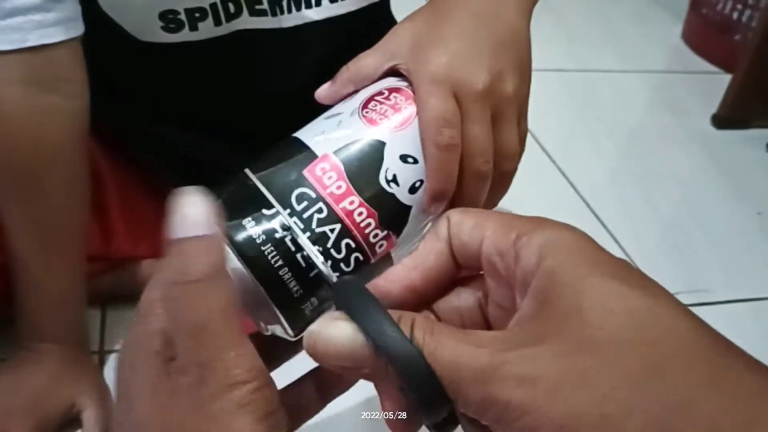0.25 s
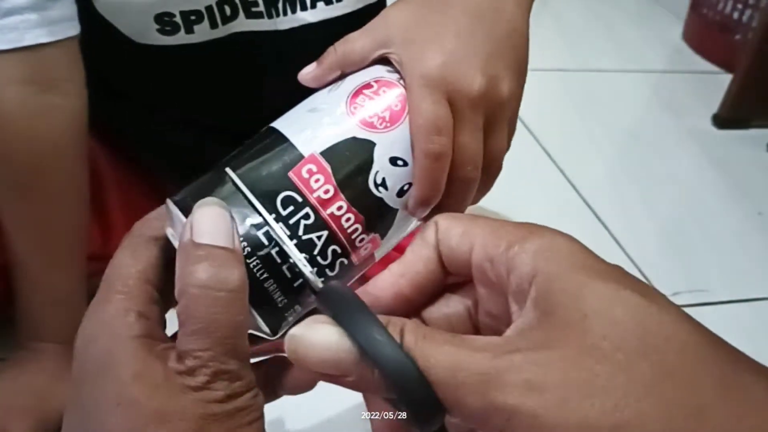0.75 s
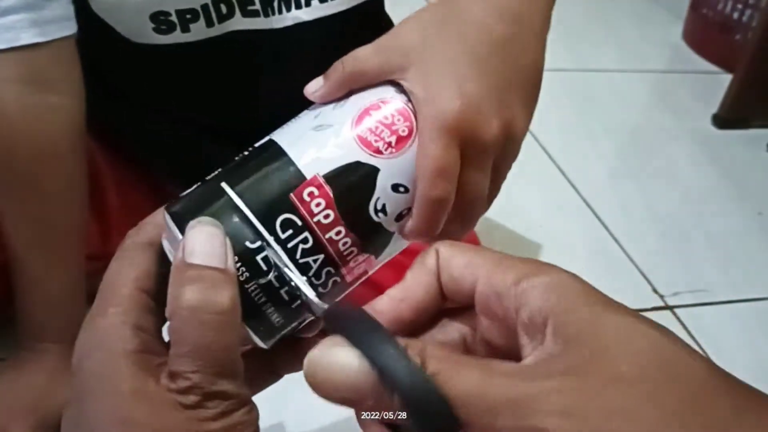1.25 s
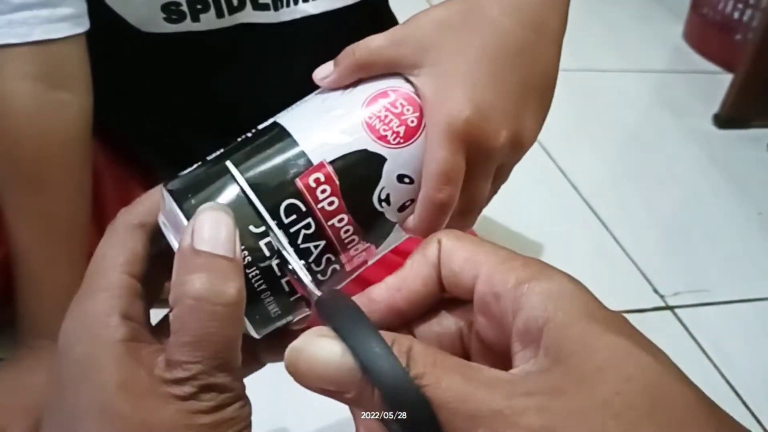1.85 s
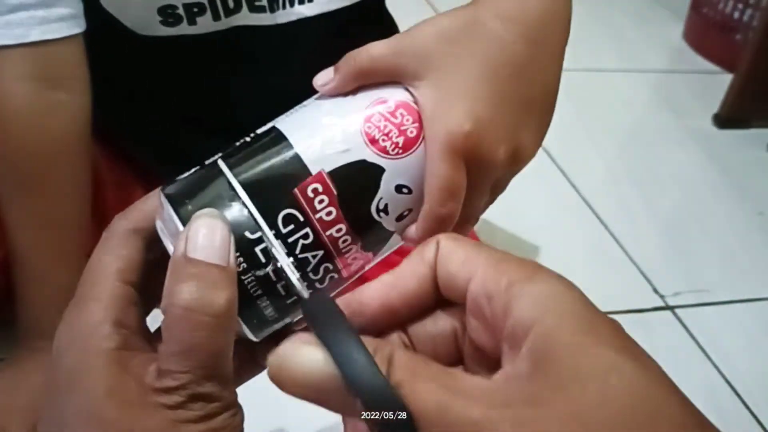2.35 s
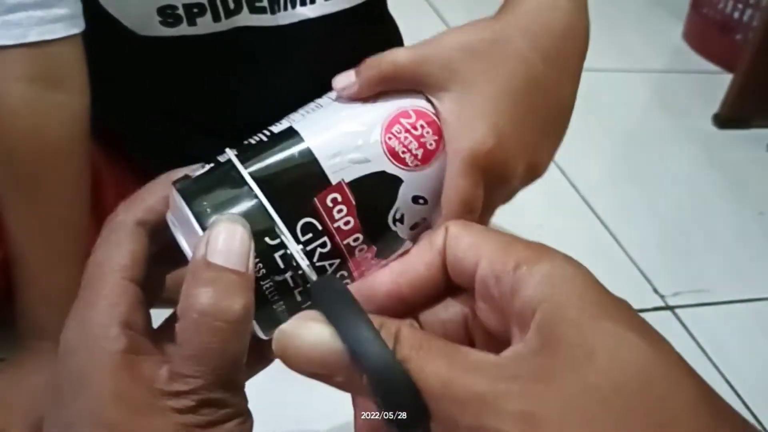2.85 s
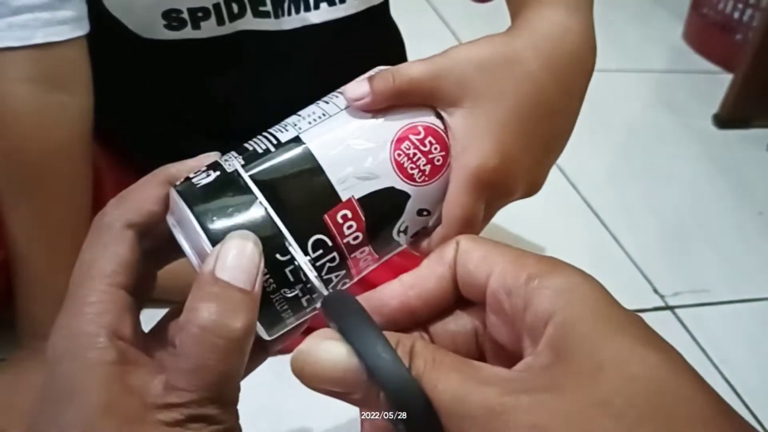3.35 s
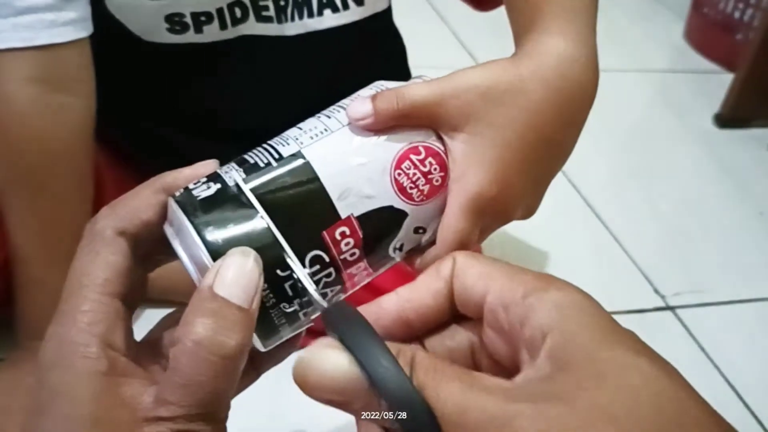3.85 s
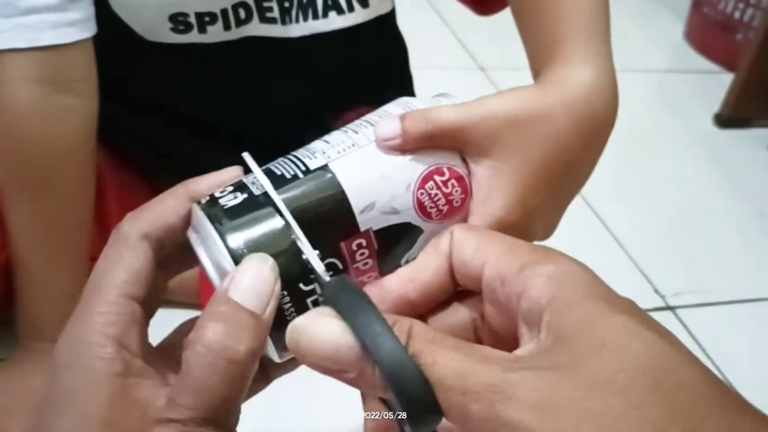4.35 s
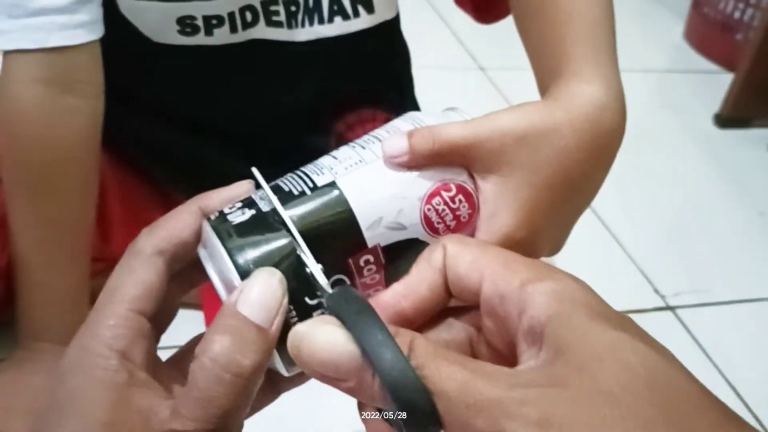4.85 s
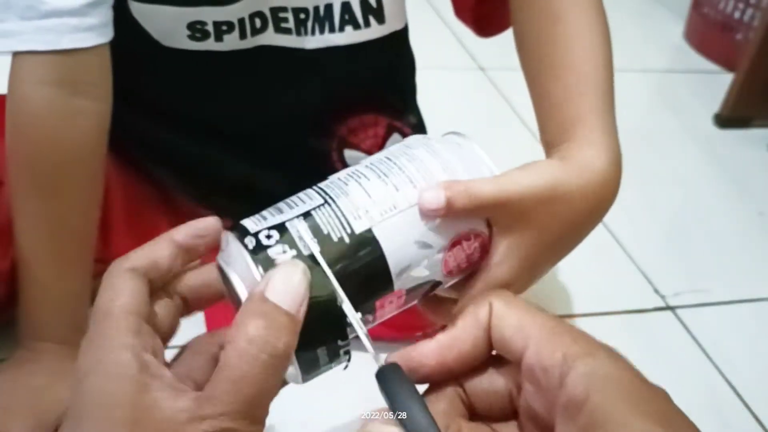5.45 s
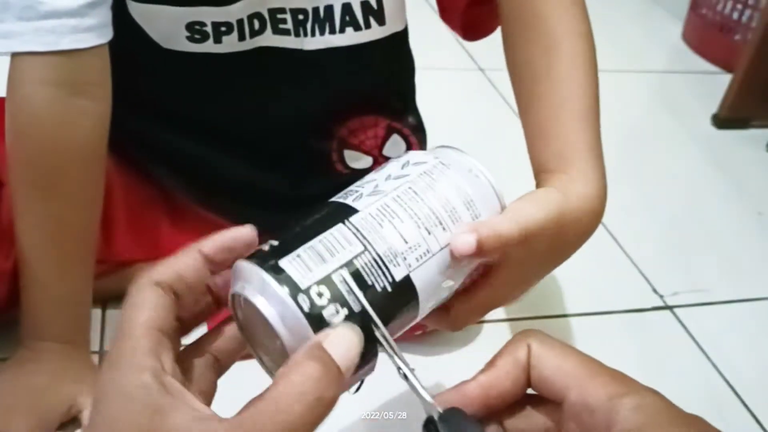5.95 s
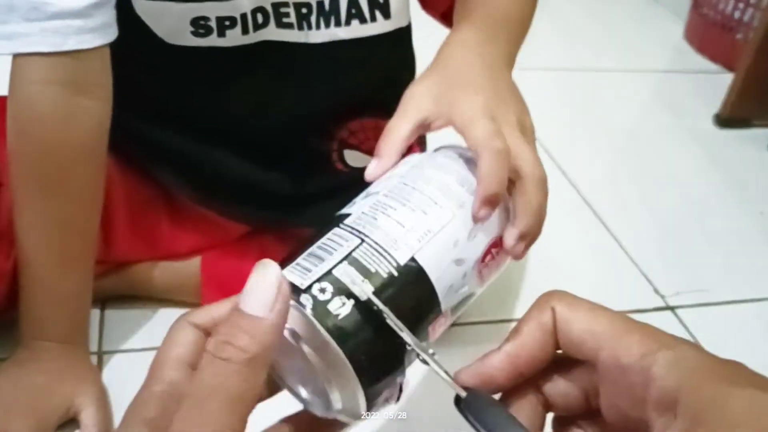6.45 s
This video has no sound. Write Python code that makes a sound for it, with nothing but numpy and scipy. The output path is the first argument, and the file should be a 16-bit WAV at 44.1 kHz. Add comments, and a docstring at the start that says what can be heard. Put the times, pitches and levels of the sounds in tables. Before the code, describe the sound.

Scissors cut through an empty drinks can close by, with sharp metallic snaps, short rasps and faint squeaks in a small room.

```python
"""Scissors cutting an empty drinks can

Close by, in a small tiled room, the blades rasp through the thin metal in short strokes and squeak faintly.
The can's wall snaps and buckles, and the cut edge rings. Hands shift on the can, over a low hum and room
noise. The loudest snaps overload the microphone."""
import sys
import numpy as np
from scipy import signal
from scipy.fft import rfft, irfft, next_fast_len
from scipy.io import wavfile
from scipy.ndimage import uniform_filter1d

SR = 44100
rng = np.random.default_rng(int(sys.argv[2]) if len(sys.argv) > 2 else 0)


def generate_wav(sig):
    """Save sig (samples, or channels by samples) to the path in sys.argv[1] as 16-bit PCM at SR."""
    pcm = np.round(np.clip(np.atleast_2d(sig).T, -1, 1) * 32767).astype(np.int16)
    wavfile.write(sys.argv[1], SR, pcm)


N = 295029
CUTOFF_HZ = 15500

# Snaps of the wall, with relative levels: t/s, peak/dB, bass/dB, middle/dB, top/dB
SNAPS = [(0.219, 3, -30.5, -15, -28.5), (0.263, -5, -27.5, -16, -31.5), (0.32, -10.5, -26.5, -20.5, -45.5),
         (0.376, 2, -18.5, -13, -19), (0.442, -11.5, -29, -23, -37.5), (0.583, -24, -40.5, -47.5, -50.5),
         (0.743, -23, -36.5, -40.5, -46.5), (1.14, 2, -47, -14, -13.5), (1.202, -2.5, -32, -19, -21.5),
         (1.332, 1, -32, -22, -16.5), (1.415, -1.5, -31, -23, -23), (1.608, -2.5, -24.5, -24, -32.5),
         (1.924, -20, -47.5, -26, -41.5), (2.008, -11.5, -40.5, -12, -41), (2.033, -7, -27, -22, -19),
         (2.057, -2.5, -29.5, -10, -21), (2.196, -12, -35, -43, -26), (2.285, -9, -29.5, -31, -35),
         (2.375, -13.5, -30, -38, -31.5), (2.491, -0.5, -22, -8, -16.5), (2.503, -9, -17.5, -22, -26),
         (2.641, 2.5, -26.5, -18.5, -10.5), (2.655, 2, -30.5, -22.5, -12.5), (2.957, 2.5, -22, -4.5, -23.5),
         (2.993, -6, -38, -17, -36.5), (3.094, -5, -30, -28.5, -24.5), (3.486, -11.5, -37, -20.5, -42),
         (3.673, 0.5, -31.5, -14, -24.5), (3.765, -13, -24.5, -26.5, -35), (3.899, 0, -20.5, -21, -10.5),
         (3.946, -5, -27.5, -18, -25.5), (3.984, -4.5, -24.5, -14.5, -22.5), (4.018, -0.5, -22.5, -17, -28),
         (4.159, -18, -29, -26, -38.5), (4.424, -17.5, -31, -24.5, -44.5), (4.481, -7.5, -22, -29.5, -31.5),
         (4.722, -25.5, -32.5, -47.5, -62), (4.88, -2, -34, -30.5, -24.5), (4.971, 6, -29.5, -8.5, -16.5),
         (5.062, -6, -38.5, -20, -36.5), (5.15, -0.5, -26.5, -24.5, -16), (5.254, -11.5, -33, -40.5, -40),
         (5.361, 0, -56.5, -24, -17.5), (5.374, 1, -47, -36, -9), (5.43, -5, -39.5, -23.5, -17),
         (5.764, 6, -24, -8.5, -9), (5.806, -6.5, -23, -5, -37), (6.009, -2, -20.5, -4, -40.5),
         (6.049, 2, -14, -20.5, -11.5), (6.162, -1, -18, -9, -16.5), (6.167, 0.5, -28, -23.5, -20),
         (6.322, -8.5, -27.5, -24.5, -20), (6.622, -18.5, -40, -32.5, -35)]
def snaps(modes, rise_s=0.00024, spike_s=0.00038, delay_s=0.0013, damping=0.27, gain_db=-7.5):
    """Stressed metal gives way with a sharp crack; the spot that buckles sets the tone colour."""
    out = np.zeros(N)
    times, peaks, *bands = np.transpose(SNAPS)
    shares = np.transpose(bands - peaks)
    colours = shares - shares.mean(axis=0) + [1, 2, -2.5]   # the average snap's bass, middle and top
    # A harder jolt against the gripping hands dies sooner. t60 is the time to fade by 60 dB.
    ring_times = np.clip(0.043 * from_db(-damping * (peaks - peaks.mean())), 0.008, 1)
    for s, peak_db, t60, colour in zip(times, peaks, ring_times, colours):
        t = seconds(t60)
        crack = wall_ring(modes, t60, *colour) * (1 - np.exp(-t / rise_s))
        spike = 1 + 0.76 * np.exp(-t / spike_s)
        add(out, s + delay_s, from_db(peak_db + gain_db) * crack * spike)
    return out


# Strokes of the blades, with relative levels: start/s, end/s, level/dB, bass/dB, brightness/dB
STROKES = [(0, 0.07, -23.5, -15, 0.5), (0.245, 0.254, -28, 3, 1), (1.091, 1.101, -41.5, 14.5, -9),
           (1.161, 1.311, -25, -10, -0.5), (1.793, 1.913, -38.5, 16, -4), (1.945, 1.996, -31.5, -4, -22),
           (2.01, 2.048, -23, -4.5, -22), (2.174, 2.255, -20.5, 8.5, -3), (2.277, 2.368, -25, 12.5, 2),
           (2.497, 2.536, -17, -2.5, -7.5), (2.864, 2.937, -37.5, -1, -6.5), (2.922, 2.961, -24.5, 4, -10),
           (3.111, 3.205, -29.5, 19, -13), (3.398, 3.501, -41.5, -1, -2), (3.628, 3.74, -25, 7, 1),
           (3.765, 3.811, -28.5, 17, 3), (3.824, 3.903, -37, 10, -4), (3.903, 3.975, -19, 10, -3),
           (4.17, 4.282, -34.5, 14, -5.5), (4.451, 4.512, -25, 9, -2.5), (4.872, 4.964, -24.5, -4, 6.5),
           (4.972, 5.049, -23.5, 4, 9.5), (5.165, 5.257, -32.5, 14.5, 1), (5.398, 5.525, -22.5, -27, 9),
           (5.869, 5.998, -38.5, 12, 18), (5.991, 6.047, -26.5, 7, -2), (6.146, 6.191, -20, 11, -15),
           (6.345, 6.551, -38.5, -1, 7), (6.598, 6.695, -31.5, 9, -0.5)]
def rasps(modes, slips_per_s=1000, bite_s=0.0054, release_s=0.0098, catch_db=13, gain_db=-5.5):
    """Cutting is a run of tiny uneven slips that each jolt the wall; a few catch and crackle."""
    out = np.zeros(N)
    for start, end, level_db, bass_db, bright_db in STROKES:
        t = seconds(max(end - start, 0.008))
        pressure = np.minimum(1, np.minimum(t / bite_s, (t[-1] - t) / release_s))
        colour = bass_db, -0.47 * bright_db, bright_db - 4   # brighter: less middle, more top
        jolts = np.array([wall_ring(modes, 0.016, *colour) for _ in range(3)])
        shape = (len(jolts), len(t))
        sizes_db = np.clip(rng.standard_normal(shape), -2, 2)
        sizes_db += catch_db * (rng.random(shape) < 0.03)
        slips = (rng.random(shape) < slips_per_s / len(jolts) / SR) * from_db(sizes_db)
        pushes = slips * pressure * rng.choice([-1, 1], shape)
        grind = signal.fftconvolve(pushes, jolts, axes=1).sum(axis=0)
        add(out, start, from_db(level_db + gain_db) * rms_one(grind) * np.sqrt(len(grind) / len(t)))
    return out


# How strongly the wall rings at each pitch: f/Hz, level/dB
WALL = [(120, -25), (200, 0), (365, -23.5), (422, -2.5), (618, -12.5), (906, -4.5), (1330, -7),
        (1950, -6.5), (2250, -10), (3750, -3.5), (6590, -4.5), (7900, 1), (12000, -14), (14700, -7),
        (15500, -4)]
def wall_modes(count=480):
    """A thin can has hundreds of crowded modes, the tones it rings at: their pitches and strengths."""
    root = np.linspace(np.sqrt(230), np.sqrt(CUTOFF_HZ), count)
    hz = (root + (root[1] - root[0]) * rng.uniform(-0.83, 0.24, count)) ** 2
    return hz, from_db(at_hz(WALL, hz)) * np.sqrt(root)   # high modes are sparser, so each gets more


# Where the bass, middle, upper middle and top of a jolt lie: f/Hz
BANDS_HZ = [750, 2800, 7300, 13000]
def wall_ring(modes, t60, bass_db, middle_db, top_db, uneven_db=2.5, detune=0.0053):
    """One jolt of the wall: where it lands decides which modes answer, and bending detunes them."""
    hz, gains = modes
    colour_db = at_hz(list(zip(BANDS_HZ, [bass_db, middle_db, 0, top_db])), hz)
    bent_hz = hz * (1 + detune * rng.standard_normal(len(hz)))
    strengths = gains * from_db(colour_db + uneven_db * rng.standard_normal(len(hz)))
    t = seconds(t60)
    phase = 2 * np.pi * (np.outer(bent_hz, t) + rng.random((len(hz), 1)))
    return rms_one(strengths @ np.sin(phase.astype(np.float32))) * from_db(-60 * t / t60)


# Tones of the can that the hands hardly muffle: f/Hz, gain/dB, t60/s
CAN_MODES = [(421, -20, 0.41), (679, -2.5, 0.41), (763, -0.5, 0.19), (888, -3, 0.45), (1898, 3.5, 0.21),
             (3190, 3, 0.15), (8100, -0.5, 0.045)]
def can_body(x):
    """Every jolt also feeds the can's longer-lasting tones."""
    out = np.zeros(N)
    for hz, gain_db, t60 in CAN_MODES:
        r = from_db(-60 / (t60 * SR))   # share of the ring left after one sample
        feed = (1 - r * r) / 2 * np.array([1, 0, -1])
        feedback = [1, -2 * r * np.cos(2 * np.pi * hz / SR), r * r]
        out += from_db(gain_db) * signal.lfilter(feed, feedback, x + 1e-18)
    return out


# Flexes of the metal: t/s, f/Hz, level/dB, t60/s
FLEXES = [(.222, 611, -28.5, 0.59), (.223, 1966, -25, 0.21), (0.379, 1115, -14.5, 0.014),
          (.446, 2050, -20, 0.058), (1.142, 689, -41, 1), (1.205, 1890, -21, 0.19),
          (1.61, 940, -18.5, 0.032), (2.491, 3355, -27, 0.21), (2.503, 679, -29.5, 0.31),
          (2.719, 997, -11, 0.019), (2.724, 767, -26.5, 0.36), (3.487, 1934, -28, 0.22),
          (3.937, 980, -22, 0.095), (3.948, 1036, -19, 0.11), (3.983, 894, -12, 0.055),
          (4.02, 1120, -10.5, 0.023), (4.061, 3220, -35.5, 0.4), (4.497, 934, -26, 0.14),
          (4.498, 462, -30.5, 0.075), (5.765, 8100, -26, 0.38), (5.768, 3305, -33.5, 0.43),
          (5.766, 761, -31, 0.35), (6.011, 1697, -21, .15), (6.161, 1175, -20.5, 0.056)]
def flexes():
    """A patch of wall or the cut edge flexes with a hollow pop or a longer ring."""
    return beating_tones(FLEXES, split=0.06, side_share=0.52, rise_s=0.00091)


# Knocks as the blades break through: t/s, f/Hz, level/dB, t60/s
KNOCKS = [(.475, 83, -36.5, .08), (2.365, 111, -37, 0.18), (5.376, 102.6, -18, 0.018)]
def knocks():
    """Dull thumps travel through the hands."""
    return beating_tones(KNOCKS, split=0.13, side_share=0.48, rise_s=0.0016)


# The tones in a squeak: pitch ratio, relative level/dB
SQUEAK_TONES = [(0.566, -2), (.985, 6), (1.03, -2.5), (1.31, -10), (1.56, -8.5), (1.89, 2.5)]
# Slides of blade on blade, one list of points each: t/s, f/Hz, level/dB
SLIDES = [
    [(4.17, 7000, -73), (4.22, 7750, -52), (4.27, 8180, -50), (4.34, 8200, -51), (4.41, 8040, -51),
     (4.46, 7600, -68)],
    [(5.89, 7350, -68), (5.96, 7600, -51.5), (6.02, 7450, -53)],
]
def squeaks(waver=0.0016, flutter_db=5.0, hiss_db=-4.0):
    """Sliding blades sing unsteadily over a faint hiss; the pitch bends as the point of contact moves."""
    out = np.zeros(N)
    for slide in SLIDES:
        s, pitch, level = np.transpose(slide)
        t = s[0] + seconds(s[-1] - s[0])
        sound = from_db(hiss_db) * rng.standard_normal(len(t))
        for ratio, db in SQUEAK_TONES:
            hz = ratio * np.interp(t, s, pitch) * (1 + waver * drift(t, width_s=0.00098))
            gain = from_db(db + flutter_db * drift(t, width_s=0.011))
            sound += gain * np.sin(2 * np.pi * np.cumsum(hz) / SR)
        add(out, s[0], from_db(np.interp(t, s, level)) * sound)
    return out


# Tone colour of the echoes: f/Hz, gain/dB
ECHO = [(200, -6.5), (700, -8.5), (2000, -8.5), (4000, -6), (8000, -8), (15000, -9)]
def room_echo(x, t60=0.43, gap_s=0.0087, build_s=0.0053, gain_db=0.5):
    """Echoes from tiles and walls thicken after a short gap, then die away."""
    t = seconds(0.6)
    swell = 1 - np.exp(-(np.maximum(t - gap_s, 0) / build_s) ** 2)
    decay = swell * from_db(-60 * t / t60)
    echoes = noise(len(t), ECHO) * decay / np.sqrt(np.sum(decay ** 2))
    return from_db(gain_db) * signal.fftconvolve(x, echoes)[:N]


# How loud the hands are: t/s, level/dB
GRIP = [(0.0, -48.5), (0.47, -46), (0.52, -48.5), (1.21, -57), (1.3, -45.5), (3.2, -44), (3.26, -53.5),
        (3.76, -38), (3.89, -48), (4.57, -44), (4.66, -60.5), (5.37, -41), (5.44, -58.5), (6.18, -38.5),
        (6.56, -49), (6.69, -43)]
# Tone colour of their rumble: f/Hz, relative level/dB
RUMBLE = [(15, -52.5), (25, -37.5), (65, 1), (118, 2.5), (162, -2.5), (260, -19.5), (340, -42.5),
          (570, -120)]
def hands():
    """Hands shifting their grip on the can make a low rumble."""
    return loudness_curve(GRIP) * rms_one(noise(N, RUMBLE))


# How loud the hum is: t/s, level/dB
HUM = [(1.25, -64.5), (1.62, -41), (1.85, -50.5), (2.05, -47.5), (2.5, -58.5), (2.9, -64)]
def hum(hz=133):
    """One low tone swells and fades in the background."""
    return loudness_curve(HUM) * np.sqrt(2) * np.sin(2 * np.pi * hz * np.arange(N) / SR)


# Tone colour of the quiet room: f/Hz, relative level/dB
ROOM_NOISE = [(110, -19), (200, -7.5), (350, -7), (730, -9.5), (2400, -20), (4600, -18), (8000, -25.5),
              (11000, -28.5), (15500, -29)]
def room_noise(level_db=-45.5):
    """A soft, steady rush fills the room."""
    return from_db(level_db) * rms_one(noise(N, ROOM_NOISE))


def beating_tones(table, split, side_share, rise_s):
    """Each row starts five close tones in step; they slip apart, so the sound pulses as it fades."""
    out = np.zeros(N)
    gains = np.array([side_share, side_share, 1, side_share, side_share])
    for s, hz, level_db, t60 in table:
        t = seconds(t60)
        offsets = split * np.array([-1, -0.49, 0, 0.23, 0.99]) * rng.uniform(0.55, 1.5, size=5)
        tone = rms_one(gains @ np.sin(2 * np.pi * np.outer(hz * (1 + offsets), t)))
        add(out, s, from_db(level_db - 60 * t / t60) * tone * (1 - np.exp(-t / rise_s)))
    return out


def from_db(db):
    """Turn decibels into a gain to multiply by."""
    return 10 ** (np.asarray(db) / 20)


def rms_one(x):
    """Scale a sound so its average strength (rms) is one."""
    return x / np.sqrt(np.mean(x ** 2) + 1e-20)


def seconds(length):
    """The time of each sample over a length in seconds."""
    return np.arange(max(int(length * SR), 2)) / SR


def loudness_curve(points):
    """Join (t/s, level/dB) points into a gain for every sample."""
    return from_db(np.interp(np.arange(N) / SR, *np.transpose(points)))


def at_hz(points, hz):
    """Read a level between (f/Hz, level/dB) points, with octaves evenly spaced."""
    pitches, db = np.transpose(points)
    return np.interp(np.log(np.maximum(hz, 1)), np.log(pitches), db)


def noise(count, colour):
    """Random noise with the given tone colour."""
    size = next_fast_len(count)
    gains = from_db(at_hz(colour, np.arange(size // 2 + 1) * SR / size))
    return irfft(rfft(rng.standard_normal(count), size) * gains, size)[:count]


def drift(t, width_s):
    """A random wobble, smoothed over width_s."""
    return rms_one(uniform_filter1d(rng.standard_normal(len(t)), size=max(int(width_s * SR), 1)))


def add(out, s, sound):
    """Mix a sound in, starting at s seconds."""
    at = min(max(round(s * SR), 0), N)
    out[at:at + len(sound)] += sound[:N - at]


def scene():
    """The can and scissors with their echo, over the hands, a hum and room noise."""
    modes = wall_modes()
    cutting = snaps(modes) + rasps(modes)
    can = cutting + can_body(cutting) + flexes() + squeaks()
    background = hands() + knocks() + hum() + room_noise()
    return (can + room_echo(can) + background)[None]


def suppress_noise(x, above_hz=300, threshold_db=-42, softness_db=8.0, depth_db=19.5, window_s=0.026):
    """A noise suppressor turns down everything above the bass whenever that part falls quiet."""
    upper = signal.sosfiltfilt(signal.butter(2, above_hz, "high", fs=SR, output="sos"), x)
    power = np.abs(uniform_filter1d(upper ** 2, int(window_s * SR)))
    level_db = 10 * np.log10(power + 1e-12)
    closed = (1 + np.tanh((threshold_db - level_db) / softness_db)) / 2
    return x + upper * (from_db(-depth_db * closed) - 1)


def record(dry, ceiling=0.77, low_cut_hz=38):
    """Quiet parts are turned down, overload rounds the peaks, and the deepest bass and very top are cut."""
    x = suppress_noise(dry)
    rounded = x / (1 + (x / ceiling) ** 4) ** (1 / 4)
    thinned = signal.sosfilt(signal.butter(2, low_cut_hz, "high", fs=SR, output="sos"), rounded)
    return signal.sosfilt(signal.ellip(10, 0.2, 80, CUTOFF_HZ, fs=SR, output="sos"), thinned)


dry = scene()
out = record(dry)
generate_wav(out)
```